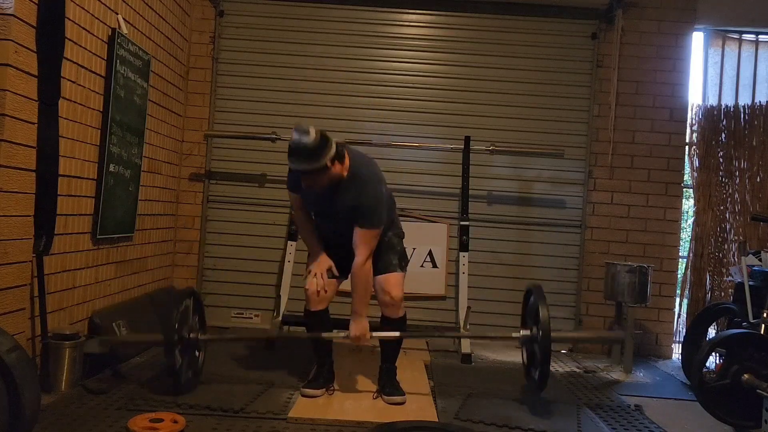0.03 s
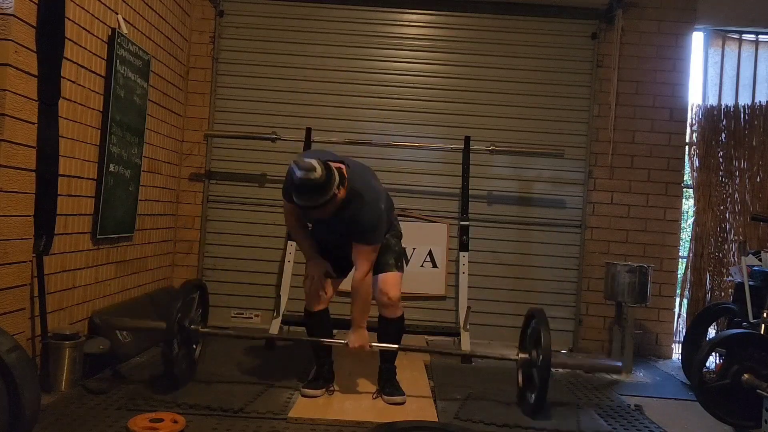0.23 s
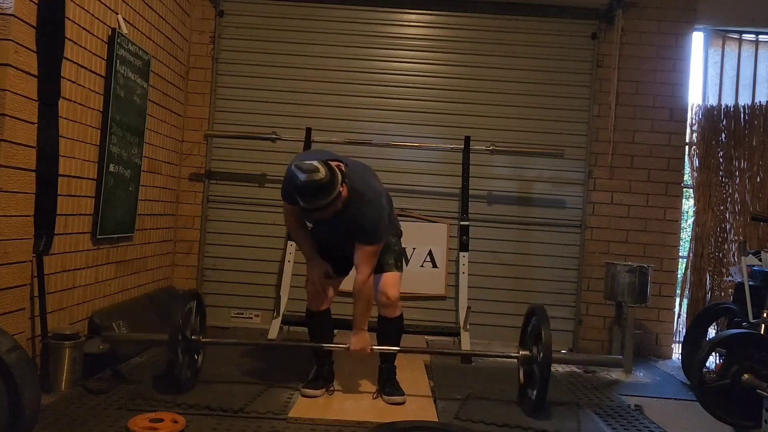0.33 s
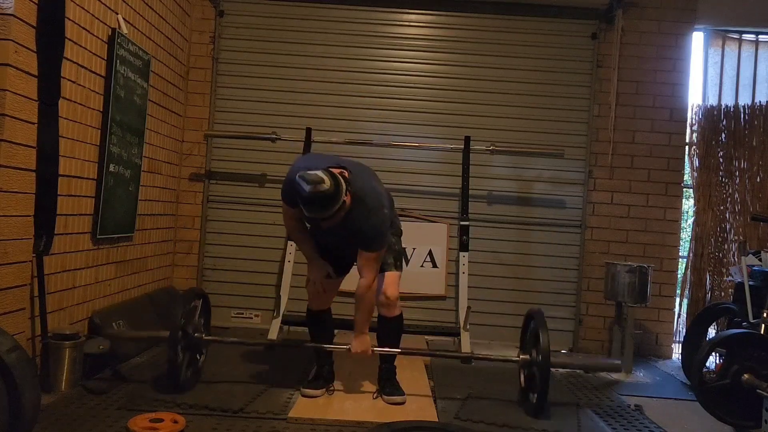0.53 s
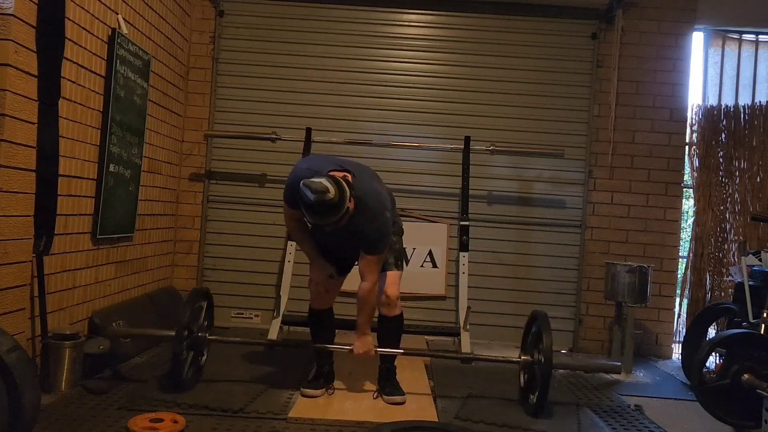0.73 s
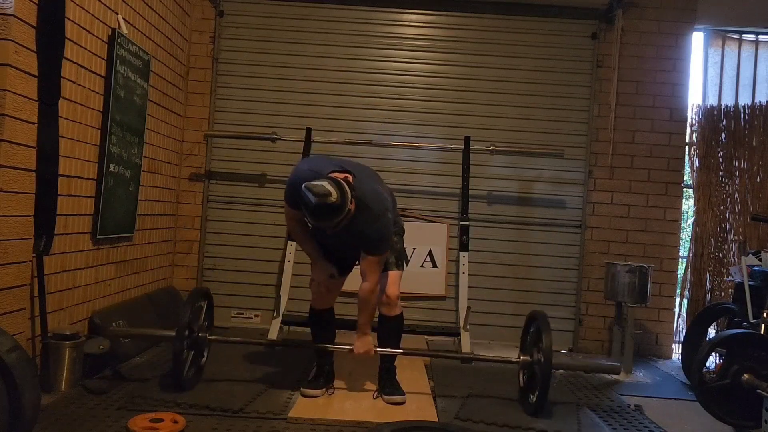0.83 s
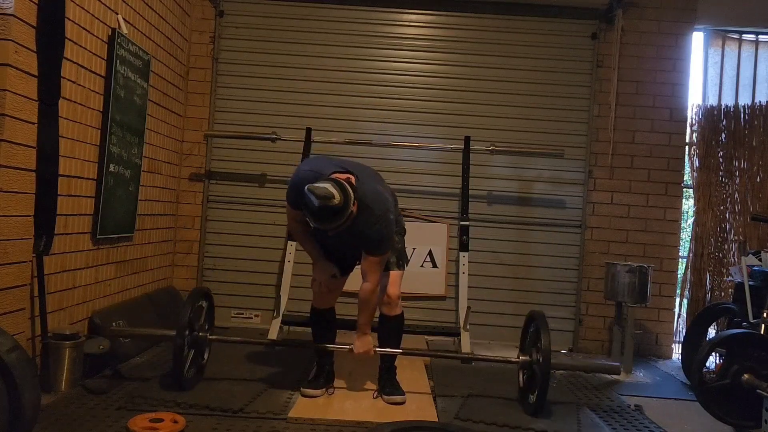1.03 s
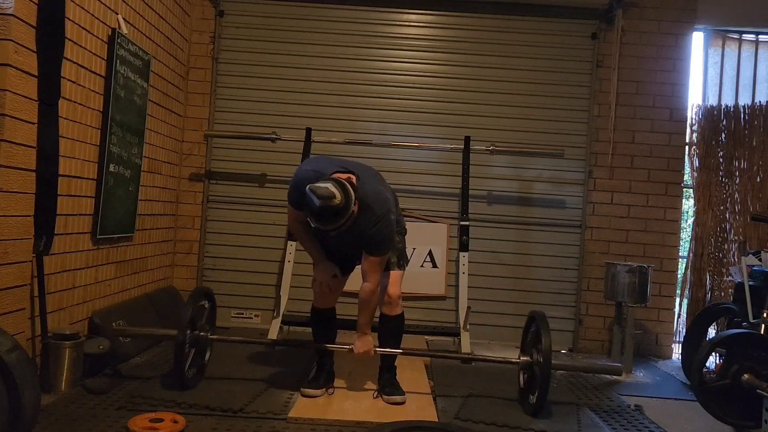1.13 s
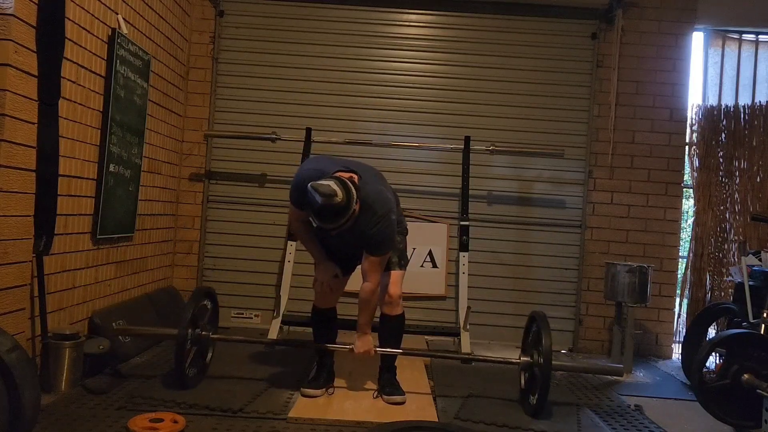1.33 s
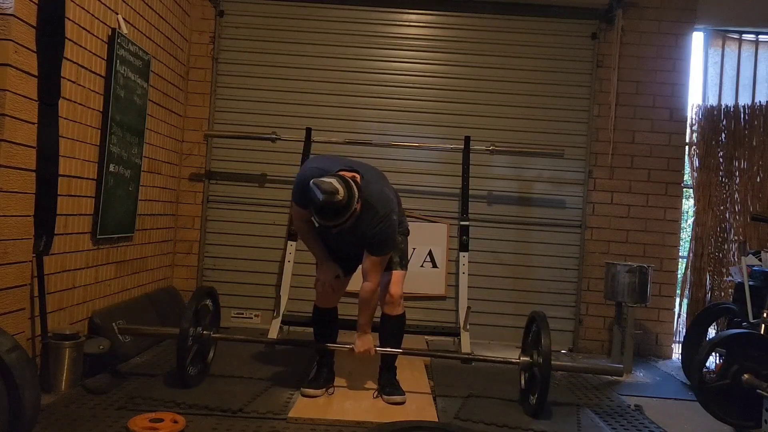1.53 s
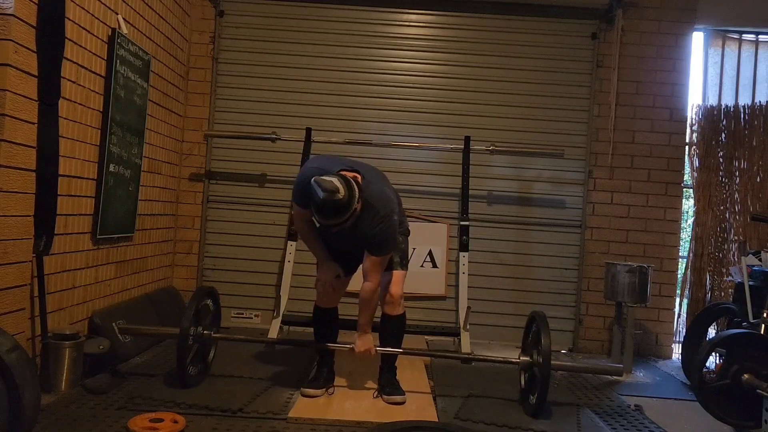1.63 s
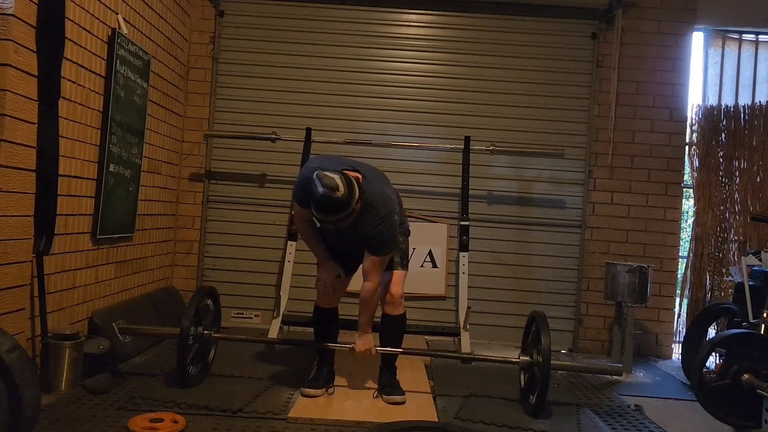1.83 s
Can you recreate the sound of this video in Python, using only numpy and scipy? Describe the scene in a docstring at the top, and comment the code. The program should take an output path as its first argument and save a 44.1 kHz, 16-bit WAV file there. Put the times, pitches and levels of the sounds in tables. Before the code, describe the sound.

A barbell with iron plates is dropped in a brick garage. A soft scrape and dull knock lead into loud clanging at 0.2 seconds, with a low floor boom around 0.3. The other end lands near 0.55 and bounces at about 0.7, the loose plates chattering on the bar. The metallic ringing and room echo fade by roughly 1.5 seconds, leaving a faint low rumble.

```python
"""A soft scrape, then loud clanging: a barbell with iron plates is dropped in a brick garage.
One end lands, then the other, and it bounces. At each blow the loose plates chatter on the bar,
plates and bar ring, the floor booms and the room answers.
The ringing dies away into a low background rumble."""
import sys
import numpy as np
from scipy import signal
from scipy.fft import rfft, irfft, next_fast_len
from scipy.io import wavfile
from scipy.ndimage import map_coordinates

SR = 44100
rng = np.random.default_rng(int(sys.argv[2]) if len(sys.argv) > 2 else 0)


def store_pcm(level_fs):
    """Save levels as 16-bit WAV."""
    pcm = np.round(np.clip(level_fs, -1, 1) * 32767).astype(np.int16)
    wavfile.write(sys.argv[1], SR, np.atleast_2d(pcm).T)


N = 83790
T = np.arange(N) / SR

# The blows of the plates. Each row: start in seconds, level in dB, chatter length in seconds,
# brightness in dB per octave, share on the second end from 0 to 1, extra ring in dB,
# favoured pitch in Hz.
PLATE_BLOWS = [(0.196, -35, .006, -1.5, 0.1, -9, 1377), (0.2054, -18.5, .01, .5, 0.32, -1, 1380),
               (0.224, -16.5, 0.031, 0, 0, -6, 4407), (0.247, -17, 0.028, 2.5, 0, -3, 682),
               (0.326, -14.5, .04, 2, 0.3, -8.5, 1072), (0.37, -21.5, 0.052, 0.45, 0.1, -4, 676),
               (0.556, -18, 0.014, 1.3, 0.3, -9.5, 1296), (0.571, -14.5, 0.029, 3, 0.8, -6, 7210),
               (0.635, -24, 0.048, -0.26, .95, 1, 1330), (0.717, -16, .02, 2.5, 1, -10, 1324),
               (0.735, -21, .04, 1, 1, 1, 2350), (0.797, -32.5, 0.028, -2.5, 1, 7, 1313),
               (0.912, -44, 0.013, -1, 0.26, 10, 1375)]
# The tones of plates and bar. Each row: pitch in Hz, level in dB when the first end is struck,
# level in dB for the second end, seconds to fade by 60 dB.
METAL_TONES = [ (684, -13.5, -20, .55), (700, -29, -30, 1.7), (918, -23, -12.5, .55),
               (1070, -22, -16, 1.15), (1091, -25, -22, 1.3), (1328.5, -19, -2, .58), (1364, 0, -15, .27),
               (1400, -9, -15, .82), (2260, -19, -21, .62), (2309, -24, -11.5, .58), (2393, -15, -15, .52),
               (3175, -19, -17, .42), (3478, -15, -19, .58), (3910, -18, -21, .48), (4330, -10, -12, .55),
               (4484, -15, -19, .5), (4749, -19, -12, .44), (5130, -14.5, -12, .5), (5565, -10, -17, .45),
               (6040, -14, -9.5, .43), (6540, -15.5, -13, .41), (7042, -16.5, -15, .41),
               (7510, -17, -13.5, .46), (8010, -12, -19, .36), (8538, -15.5, -14.5, .38),
               (9065, -20.5, -22, .32), (9640, -22, -28, .34), (10191, -21, -25, .3), (10760, -29, -31, .4),
               (11321, -23, -25, .3), (11908, -25.5, -26, .32)]


def amp(db):
    """Turn decibels into a gain."""
    return 10 ** (np.asarray(db) / 20)


def along(points, hz):
    """Read a value between rows of frequency and value, on a musical pitch scale."""
    freqs, values = np.transpose(points)
    return np.interp(np.log(hz + 1), np.log(freqs + 1), values)


def decay(t, t60):
    """Silent before time zero, then fading by 60 dB every t60 seconds."""
    return (t >= 0) * np.exp(-np.log(1000) * np.maximum(t, 0) / t60)


def wobble(rate):
    """A smooth random curve that passes through `rate` new values a second."""
    values = rng.standard_normal(400)
    coarse = T[::32]
    return np.interp(T, coarse, map_coordinates(values, [coarse * rate], mode="mirror"))


def filtered(x, response):
    """Scale each frequency of x by the gain that `response` gives for it."""
    size = next_fast_len(N + SR // 4)
    return irfft(rfft(x, size) * response(np.fft.rfftfreq(size, 1 / SR)), size)[..., :N]


def ear_angle(hz):
    """How far out of step the left and right ears are, in radians."""
    # Each row: frequency in Hz, likeness of the ears from -1 (opposite) to 1 (the same).
    likeness = [(150, 0.97), (280, 0.88), (700, 0.45), (1080, -0.31), (1370, -0.37), (2200, 0.1),
                (8000, -0.072)]
    return np.arccos(np.clip(along(likeness, hz), -1, 1))


def gap_db(hz):
    """The plates are nearly alike, so their ring bunches around shared tones and dips in between."""
    tones = np.transpose(METAL_TONES)[0]
    place = np.interp(hz, tones, np.arange(len(tones)))
    nearest = tones[np.round(place).astype(int)]
    distance = (np.clip(hz, tones[0], tones[-1]) / nearest - 1) / .022  # a bunch reaches about 2.2 %
    depth_db = 2 + .001 * hz
    return depth_db * (1 - np.exp(-distance ** 2))


def room_noise(spectrum, fade_times=None, tilt_db=0, metallic=False):
    """Stereo noise shaped by a spectrum; with fade_times, each frequency dies at its own speed."""
    def response(hz):
        colour = amp(along(spectrum, hz) + tilt_db * np.log2(hz + 1) - metallic * gap_db(hz))
        turn = ear_angle(hz) / 2
        return colour * [np.cos(turn), np.sin(turn)]

    mid, side = filtered(rng.standard_normal((2, N)), response)
    pair = np.array([mid + side, mid - side])
    pair /= np.sqrt(np.mean(pair ** 2) + 1e-20)
    if fade_times is None:
        return pair
    hz, t, bands = signal.stft(pair, SR, nperseg=512)
    fade = decay(t, along(fade_times, hz)[:, None])
    return signal.istft(bands * fade, SR, nperseg=512)[1][:, :N]


def background():
    """A steady low rumble and a faint hiss fill the garage."""
    # Each row of both: frequency in Hz, relative level in dB.
    rumble = [(20, -5.5), (35, -6.5), (55, -8), (85, 0), (115, -8.5), (160, -15), (260, -36), (500, -57),
              (2000, -110)]
    hiss = [(300, 0), (450, -8), (720, -4), (1200, -6), (2200, -13.5), (4000, -24), (8000, -29),
            (10000, -45.5)]
    return amp(-49) * room_noise(rumble) + amp(-65) * room_noise(hiss)


def scrape():
    """A plate slips along the bar during the fall, with a soft, unpitched scrape."""
    # Each row: frequency in Hz, relative level in dB.
    spectrum = [(500, 1.5), (2500, -1.5), (7500, -10.5), (10000, -23)]
    start_s = .087
    return amp(-52.5) * room_noise(spectrum) * decay(T - start_s, t60=.8)


def mat_knock():
    """The first touch on the mat makes a dull knock."""
    # Each row: frequency in Hz, relative level in dB.
    spectrum = [(100, -25.5), (300, -10), (470, 0), (620, -5.5), (900, -19), (3000, -25), (8000, -32),
                (16000, -51.5)]
    start_s, rise_s = .164, .0046
    rise = np.clip((T - start_s) / rise_s, 0, 1)
    return amp(-38) * room_noise(spectrum) * rise * decay(T - start_s, t60=.49)


def floor_booms():
    """The floor booms with a few low tones each time the weight comes down."""
    # Each row: start in seconds, level in dB.
    landings = [(.21, -49), (0.333, -21.5), (0.563, -31), (0.721, -35.5), (1.039, -41)]
    # Each row: pitch in Hz, relative level in dB, seconds to fade by 60 dB.
    floor_tones = [(28.6, -9, 0.77), (45.5, -5, .6), (56.5, -1, 0.5), (86.4, -7, .8), (113, -14, 0.59),
                   (169, -15.5, 0.27)]
    rise_s = .0078
    out = np.zeros(N)
    for start, db in landings:
        t = np.maximum(T - start, 0)
        rise = 1 - np.exp(-t / rise_s)
        for hz, tone_db, t60 in floor_tones:
            tone = np.sin(2 * np.pi * (hz * t + rng.random()))
            out += amp(db + tone_db) * rise * decay(t, t60) * tone
    return out


def cracks():
    """The hardest hits of bare metal on metal open with a short, bright crack."""
    # Each row: frequency in Hz, relative level in dB.
    spectrum = [(500, -8.5), (1500, 6), (5000, 0), (8000, -13.5), (10000, -12), (13000, -8), (16000, -11.5)]
    # Each row: start in seconds, level in dB.
    hits = [(0.2062, -16), (0.562, -22), (0.718, -26)]
    return sum(amp(db) * room_noise(spectrum, metallic=True) * decay(T - start, t60=.23)
               for start, db in hits)


def clang():
    """Each blow is a burst of tiny metal taps; each tap sets off the dense ring of plates and room."""
    # Each row: frequency in Hz, relative level in dB.
    spectrum = [(20, -57.5), (60, -24.5), (130, -15), (250, -18), (470, -7), (590, -13.5), (710, -0.5),
                (1180, -1), (1420, 4), (1750, -4), (2450, -1), (4400, -3.5), (5800, -6), (7600, -8),
                (9300, -22.5), (12700, -21), (16000, -37)]
    # Each row: frequency in Hz, seconds for plates and room to fade by 60 dB.
    fade_times = [(150, 1.3), (500, 0.88), (1200, 0.85), (2500, 0.7), (5000, 0.56), (8000, 0.49),
                  (14000, 0.29)]
    taps_per_s, scatter_db, boost_db = 900, .5, 2.5
    out = np.zeros((2, N))
    for start, db, length, bright_db, *_ in PLATE_BLOWS:
        count = max(2, int(length * taps_per_s))
        jitter, direction = rng.random((2, 400))[:, :count]
        tap_s = (np.arange(count) + jitter - jitter[0]).clip(0) / count * length
        strength = amp(scatter_db * rng.standard_normal(400)[:count])
        taps = np.bincount((tap_s * SR).astype(int), strength * np.sign(direction - .5))
        taps /= np.linalg.norm(taps)
        ring = room_noise(spectrum, fade_times, bright_db, metallic=True)
        blow = signal.oaconvolve(ring, taps[None], axes=1)
        first = round(start * SR)
        out[:, first:] += amp(db + boost_db) * blow[:, :N - first]
    return out


def ringing():
    """Each tone of plates and bar gathers energy while the plates chatter, then slowly loses it."""
    start, db, length, bright_db, share, ring_db, favoured_hz = np.transpose(PLATE_BLOWS)
    favour_db, favour_octaves, pivot_hz = 9.5, .11, 1460
    wobbles_per_s, flutter_db = 42, 2.6
    chatter = np.array([((T >= s) & (T < s + span)) / (span * SR) for s, span in zip(start, length)])
    out = np.zeros((2, N))
    for hz, first_db, second_db, t60 in METAL_TONES:
        # The spot that is struck favours the tones near one pitch.
        spot_db = favour_db * np.exp(-(np.log2(hz / favoured_hz) / favour_octaves) ** 2)
        push = amp(db + ring_db + spot_db + bright_db * np.log2(hz / pivot_hz))
        energy = push ** 2 * ((1 - share) * amp(first_db) ** 2 + share * amp(second_db) ** 2)
        stored = signal.lfilter([1], [1, -decay(2 / SR, t60)], energy @ chatter)
        swing = np.sqrt(2 * stored)
        # The tone wavers in pitch and level, a little differently in each ear.
        wander_rad = .46 * np.sqrt(hz / METAL_TONES[0][0])
        phase = 2 * np.pi * (hz * T + rng.random()) + wander_rad * wobble(wobbles_per_s)
        for ear, lead in zip(out, [.5, -.5]):
            offset = lead * ear_angle(hz) + wander_rad / 2 * wobble(wobbles_per_s)
            ear += swing * amp(flutter_db * wobble(wobbles_per_s)) * np.sin(phase + offset)
    return out


def scene():
    """All the sounds together, leaning slightly left except for the highest treble."""
    # Each row: frequency in Hz, how many dB louder the left is than the right.
    balance = [(100, 1.5), (900, 1.7), (1350, 2), (2200, 1.2), (8000, 1.2), (12000, -1)]
    mix = scrape() + cracks() + clang() + ringing() + mat_knock() + floor_booms() + background()
    return filtered(mix, lambda hz: amp(np.outer([.5, -.5], along(balance, hz))))


def record(dry):
    """Cut away the very highest treble with a steep filter."""
    top_hz = 15800
    return filtered(dry, lambda hz: 1 / np.sqrt(1 + (hz / top_hz) ** 200))


dry = scene()
out = record(dry)
store_pcm(out)
```